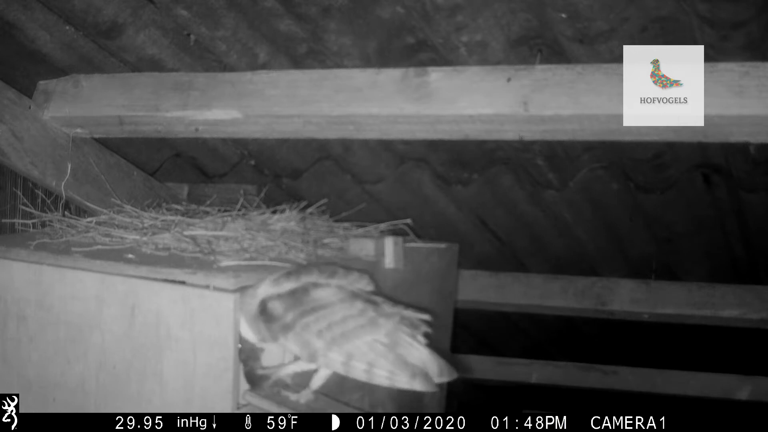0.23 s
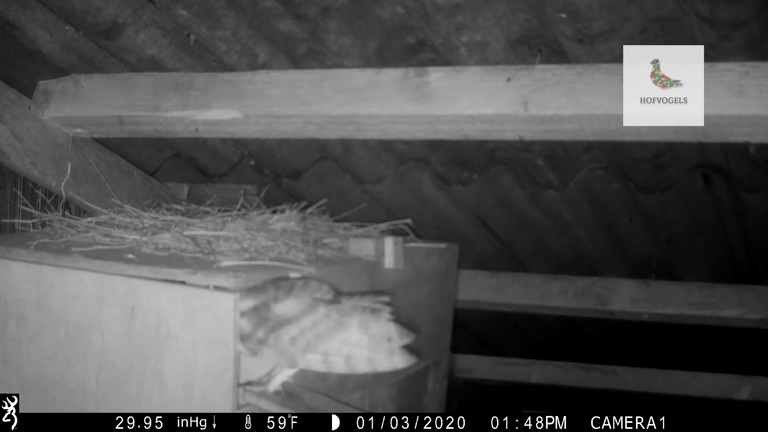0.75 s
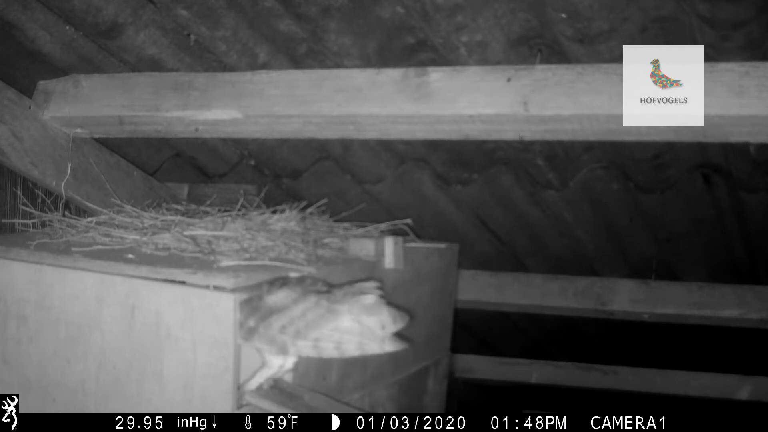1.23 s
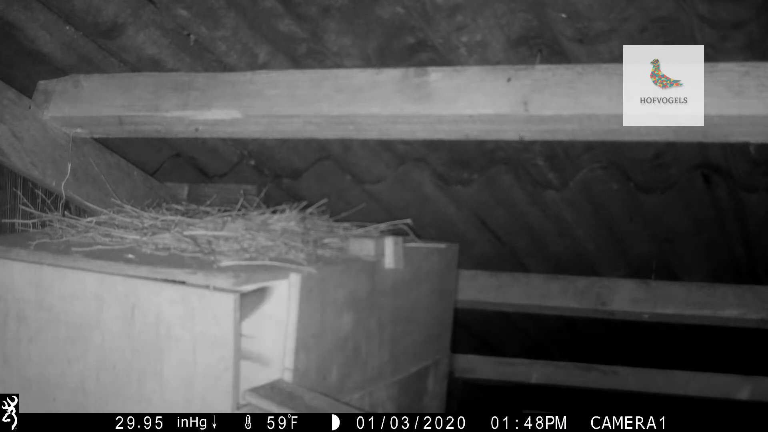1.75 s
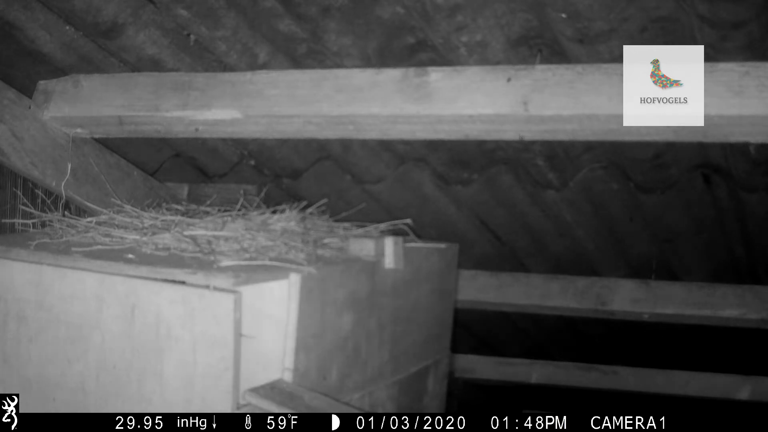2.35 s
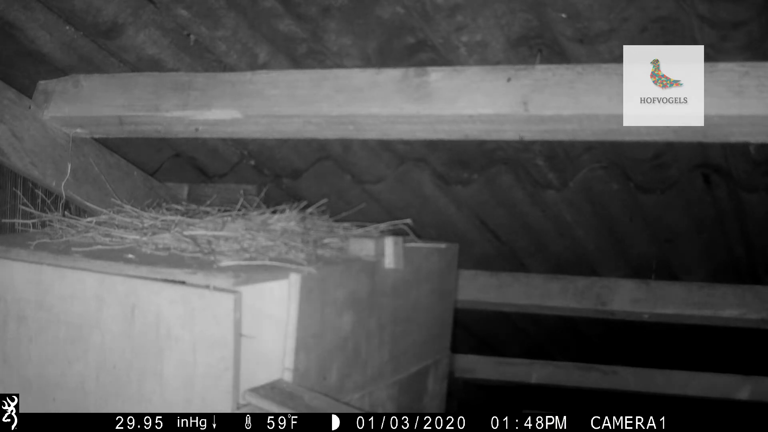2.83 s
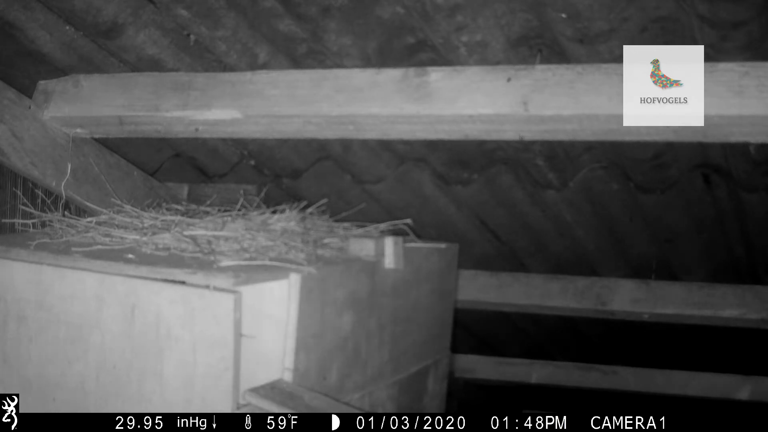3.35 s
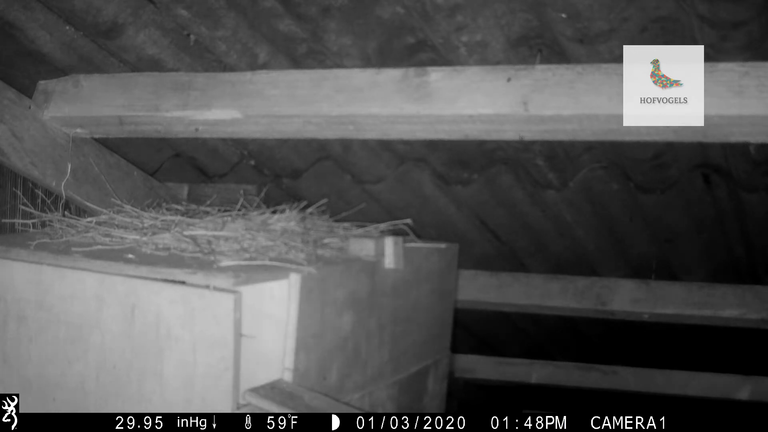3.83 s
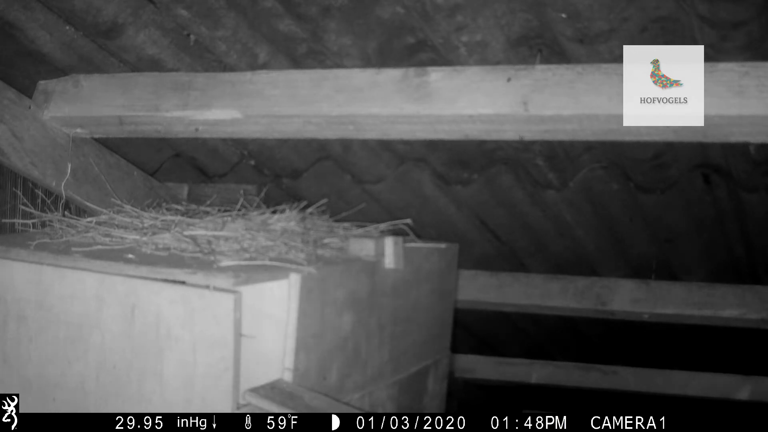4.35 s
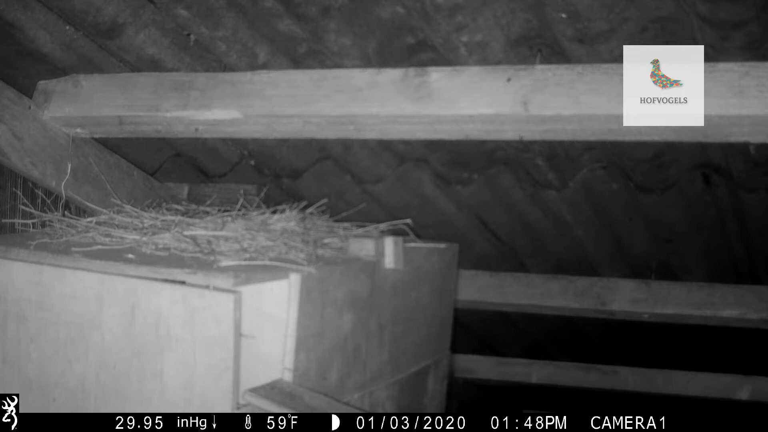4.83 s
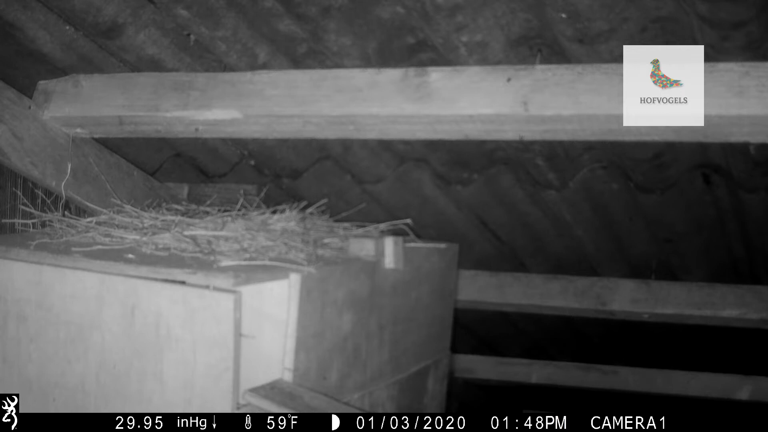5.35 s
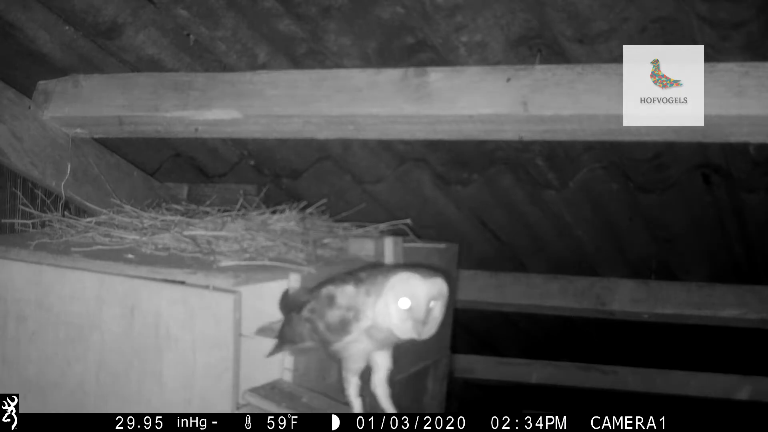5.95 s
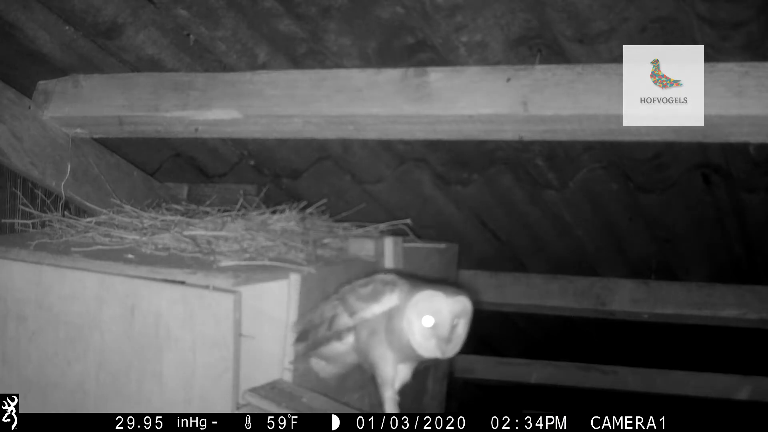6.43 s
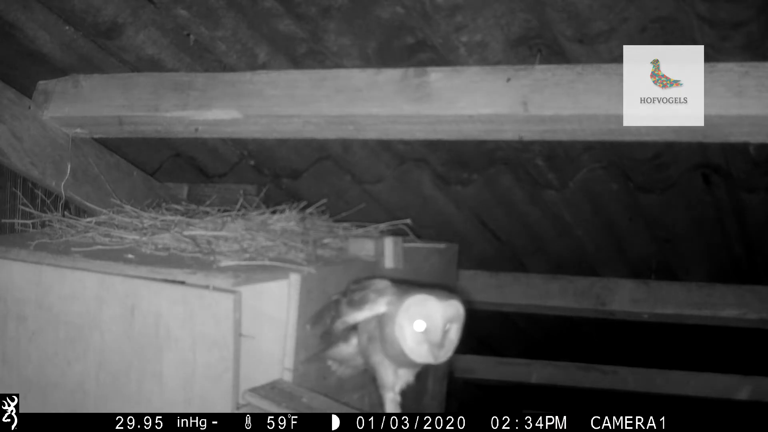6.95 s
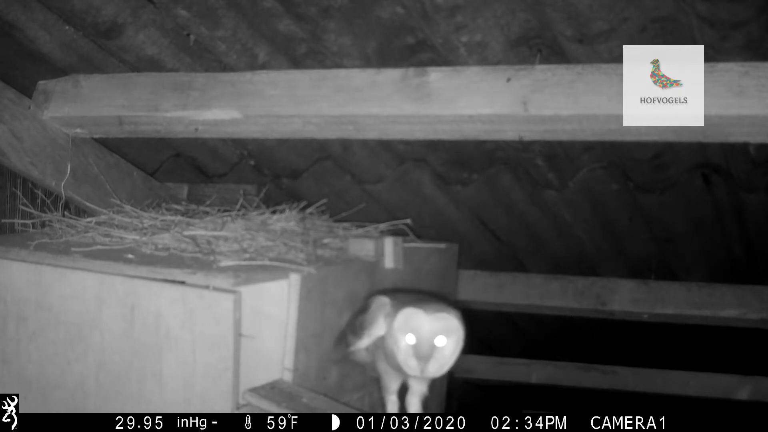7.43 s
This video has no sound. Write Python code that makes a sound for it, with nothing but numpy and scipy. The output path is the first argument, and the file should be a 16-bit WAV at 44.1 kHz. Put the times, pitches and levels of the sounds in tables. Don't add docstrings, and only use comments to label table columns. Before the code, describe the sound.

Harsh airy owl hisses swell and stop in a quiet loft, over steady rush and thin buzzing whine, with small wooden knocks and one snap.

```python
import sys
import numpy as np
from scipy import signal
from scipy.fft import rfft, irfft, next_fast_len
from scipy.io import wavfile
from scipy.ndimage import uniform_filter1d

SR = 44100
rng = np.random.default_rng(int(sys.argv[2]) if len(sys.argv) > 2 else 0)


def level_to_linear(level):
    exponent = np.asarray(level, float) / 20
    return 10 ** exponent


def unload_audio(sound):
    columns = np.transpose(np.atleast_2d(sound))
    steps = np.round(np.clip(columns, -1, 1) * 32767)
    wavfile.write(sys.argv[1], SR, steps.astype(np.int16))


N = 339129
SCENE_CHANGE_S = 5.4618


def evened(x):
    return x / np.sqrt(np.mean(x ** 2) + 1e-20)


def read(points, hz):
    f, value = np.transpose(points)
    return np.interp(np.log(hz + 1), np.log(f + 1), value)


def add(mix, start_s, sound):
    part = mix[round(start_s * SR):][:len(sound)]
    part += sound[:len(part)]


def ring(hz, db, t60, rise=0.00023):
    t = np.arange(4000) / SR
    return level_to_linear(db - 60 * t / t60) * (1 - np.exp(-t / rise)) * np.sin(2 * np.pi * hz * t)


def drift(size, smooth):
    width = max(int(smooth), 1)
    once = uniform_filter1d(rng.standard_normal(size), width)
    return evened(uniform_filter1d(once, width))


# (start [s], length [s], top effort [dB], share of length spent swelling [0-1], swell [dB])
HISSES = [
    (0.126, 0.673, -50.5, 0.86, 15),
    (1.071, 0.648, -41, 0.5, 16.5),
    (1.42, 0.55, -50.5, 0.85, 8),
    (2.545, .775, -40, 0.61, 17.5),
    (3.099, 0.45, -50.5, 0.86, 2),
    (3.765, .64, -47, 0.71, 17.5),
    (4.845, 0.79, -45.5, 0.58, 16),
    (5.4, 0.54, -44, 0.75, 10),
    (5.78, .8, -57, 1, 11),
    (6.945, .68, -49.5, 0.62, 9.5),
]
# (pitch [Hz], width [Hz], level [dB])
THROAT_1 = [(1540, 370, -11.5), (2280, 450, -11.5), (2455, 97, -1.5), (2830, 700, -5.5), (3260, 120, -10.5),
            (3440, 160, -5), (3590, 230, -4.5), (3730, 92, 4), (4180, 510, -2.5), (4580, 54, 0.5),
            (4820, 120, -11), (5080, 280, -21), (5390, 310, -16.5), (6040, 160, -24)]
THROAT_2 = [(2050, 710, -19.5), (2380, 470, -10), (2650, 140, -6.5), (2760, 120, -12.5), (3130, 170, -10),
            (3200, 160, -10), (3410, 150, -9), (3580, 180, -2.5), (3800, 160, 2), (4070, 180, -6),
            (4360, 99, -7.5), (4580, 130, -19), (4860, 420, -21.5), (5480, 160, -30)]
THROAT_3 = [(1430, 97, -2), (1640, 190, -14.5), (1990, 230, -5.5), (2336, 190, 0.5), (2580, 580, -6),
            (3030, 270, -5), (3330, 100, -8), (3620, 490, -8), (4000, 210, -7.5), (4144, 51, 2.5),
            (4350, 200, -14), (4620, 170, -10), (5000, 180, -19), (5430, 970, -27.5)]
THROAT_4 = [(1760, 430, -28), (2385, 390, -8), (2570, 120, -14), (2770, 120, -21), (3490, 200, -4),
            (3180, 210, -9), (3250, 80, -3.5), (3728, 250, 2.5), (4060, 660, -7.5), (4320, 210, -3.5),
            (4430, 77, -13), (4760, 240, -12), (5330, 390, -23.5), (5960, 360, -30.5)]
THROAT_5 = [(2070, 490, -11), (2355, 86, -3.5), (2580, 180, -13), (2880, 140, -12.5), (3180, 90, -10),
            (3240, 270, -14), (3545, 71, 2), (3694, 98, 0), (3900, 86, -2.5), (4100, 200, -7),
            (4370, 89, -4), (4780, 100, -18), (5130, 110, -24), (5600, 700, -31)]
THROAT_6 = [(1490, 110, -1), (1650, 62, -6.0), (2080, 640, -2), (2280, 92, -5), (2740, 120, -3),
            (2970, 260, -6), (3520, 380, -4), (3860, 91, -2), (4170, 430, -4.5), (4280, 190, -8.5),
            (4550, 120, -4.5), (4780, 120, -10), (5100, 840, -19.5), (5910, 130, -32)]
THROAT_7 = [(1447, 120, -13), (1700, 190, -21), (2050, 410, -19.5), (2355, 400, -5), (2640, 150, -14),
            (3080, 210, -10.5), (3410, 280, -15), (3800, 55, -1), (3840, 600, -4), (4130, 280, -8.5),
            (4560, 320, -10.5), (5050, 70, -20), (5200, 390, -21), (6300, 150, -35)]
THROAT_8 = [(1620, 120, -18), (1800, 160, -22), (2025, 160, -11.5), (2280, 104, -5.5), (2470, 58, -11),
            (2910, 610, -10.5), (3170, 150, -8), (3580, 130, -3), (3753, 66, 3), (4120, 380, -2),
            (4470, 61, -8), (4780, 160, -14.5), (5330, 170, -21.5), (5530, 120, -23)]
THROAT_9 = [(1310, 210, 0.5), (1740, 810, -9), (2320, 620, -13), (2404, 110, 5), (2640, 150, 1),
            (2810, 100, 0), (3190, 370, -9), (3500, 69, 2.5), (3790, 480, -2.5), (4130, 79, -7.0),
            (4160, 80, -4), (4360, 230, -7), (4790, 320, -13.5), (5300, 300, -23.0)]
THROAT_10 = [(1720, 510, -17), (2080, 130, -9), (2400, 220, -1.5), (2870, 290, -7.5), (3300, 260, -8),
             (3780, 120, 1.5), (3810, 510, 1.5), (4140, 70, -11), (4290, 250, 1), (4530, 130, 0.5),
             (4740, 140, -7), (5100, 220, -22), (5360, 380, -16), (6180, 280, -28)]
# (lower throat [dB], beak
# air [dB], share of missing effort the lower throat is spared [-1 to 1], attack [s])
HEADS = [(-5.5, -34, .2, 0.063), (-11.5, -37.5, 0.3, 0.041), (-0.5, -32, 0.34, .06), (-6, -35, 0.31, 0.054),
         (-4, -30, 0.4, .06), (-3.5, -33, 0.4, 0.051), (-4, -33.5, -.2, 0.075), (-7, -36, 0.34, .05),
         (-4, -35, 1, 0.054), (-4.5, -35, -.3, 0.12)]


def owls():
    out = np.zeros(N)
    throats = (THROAT_1, THROAT_2, THROAT_3, THROAT_4, THROAT_5,
               THROAT_6, THROAT_7, THROAT_8, THROAT_9, THROAT_10)
    for call, throat, head in zip(HISSES, throats, HEADS):
        add(out, call[0], hiss(call, throat, head))
    return out


# (pitch [Hz], level [dB per Hz])
BREATH = [(900, -63), (1300, -22), (1900, -33.5), (2400, -22), (2900, -24), (3700, -15), (4500, -23),
          (5100, -38), (5900, -42.5), (7000, -51.5), (8300, -38.5), (9900, -39.5), (11000, -53.5),
          (13800, -65)]


def hiss(call, throat, head):
    start, length, top_db, swelling, swell_db = call
    low_db, beak_db, low_spared, attack_s = head
    t = np.arange(0, length + 0.16, 1 / SR)
    size = 45000
    hz = np.fft.rfftfreq(size, 1 / SR)
    flutter_db = 0.15 * drift(size, 150) + 0.31 * drift(size, 900)
    air = rng.standard_normal(size) * level_to_linear(flutter_db)

    power = level_to_linear(2 * read(BREATH, hz))
    for f, width, db in throat:
        power = power + level_to_linear(2 * db) / (1 + (2 * (hz - f) / width) ** 2) ** 2

    turn = np.pi / 2 * np.minimum(np.arange(size) / len(t), 1)
    combed = 0
    for fade in (np.cos(turn) ** 2, np.sin(turn) ** 2):
        comb_db = 3.0 * drift(len(hz), 14 * size / SR)
        combed = combed + rfft(air * fade) * level_to_linear(comb_db)
    coloured = combed * np.sqrt(power)

    low = 1 / (1 + (hz / 2950) ** 30)
    high = 1 / (1 + (6800 / (hz + 1)) ** 20)
    middle = 1 - low - high
    skirt = middle / (1 + (4250 / (hz + 1)) ** 20)
    beak = high * level_to_linear(1.5 * drift(len(hz), 120))

    def sound_of(share, level_share, lo, hi):
        inside = (hz > lo) & (hz < hi)
        scale = size / np.sqrt(2 * np.sum(abs(coloured * level_share)[inside] ** 2))
        return scale * irfft(coloured * share, size)[:len(t)]

    missing_db, release_db = effort(t, length, swelling, swell_db)
    low_gain = level_to_linear(low_db + low_spared * missing_db + 0.22 * release_db)
    beak_gain = level_to_linear(beak_db + 0.35 * missing_db)
    out = sound_of(low, low, 1300, 2950) * low_gain
    out = out + sound_of(beak, beak, 8500, 11000) * beak_gain
    out = out + sound_of(middle, middle, 2950, 5600)
    out = out + sound_of(skirt, middle, 2950, 5600) * (level_to_linear(0.16 * missing_db) - 1)

    same_take = (start + t < SCENE_CHANGE_S) == (start + length / 2 < SCENE_CHANGE_S)
    attack = np.minimum(t / attack_s, 1) ** 2
    return out * level_to_linear(top_db - missing_db - release_db) * attack * same_take


def effort(t, length, swelling, swell_db):
    u, top = t / length, np.clip(swelling, 0.1, 0.95)
    swell = swell_db * np.maximum(1 - u / top, 0) ** 1.54
    sag = 3 * np.clip((u - top) / (1 - top), 0, 1) ** 2
    late = np.maximum(t - length, 0)
    release = 270 * late ** 2 / (late + 0.005)
    return swell + sag, release


# (pitch [Hz], level [dB], t60 [s])
SNAP = [(1770, -34, .03), (2130, -23, .014), (2600, -25, .011), (3480, -13, .008), (3800, -21, .011),
        (4150, -14, .007), (4450, -24, .007), (5100, -30, .006)]
# (delay [s], level [dB])
SNAP_ECHOES = [
    (0, -1),
    (.0021, -13),
    (.0043, -22),
    (.0062, -18),
    (.0085, -22),
    (.0113, -21),
    (.0168, -25),
]


def beak_snap():
    out = np.zeros(N)
    snap = sum((-1) ** k * ring(*mode, rise=0.0006) for k, mode in enumerate(SNAP))
    band = signal.butter(4, [1550, 5100], "bandpass", fs=SR, output="sos")
    snap = signal.sosfilt(band, snap)
    for delay, db in SNAP_ECHOES:
        add(out, 5.5138 + delay, level_to_linear(db) * snap)
    return out


# (time [s], peak level [dB], pitch [Hz], t60 [s])
CLAWS = [
    (1.59, -54, 1490, .04),
    (1.603, -52, 1950, 0.043),
    (1.63, -55, 1485, 0.04),
    (1.652, -51.5, 2050, 0.046),
    (4.836, -67, 3800, 0.028),
    (6.449, -54.5, 2000, 0.036),
    (6.449, -55, 3300, 0.027),
    (6.561, -55.5, 1800, 0.028),
]


def claws():
    return knocks(CLAWS, 1.25)


# (time [s], peak level [dB], pitch [Hz], t60 [s])
THUDS = [
    (1.859, -51, 640, 0.023),
    (1.862, -54, 330, 0.055),
    (1.862, -57, 150, 0.097),
    (1.881, -53, 170, 0.073),
    (1.889, -51, 450, 0.025),
    (1.925, -62, 170, 0.081),
    (2.391, -69, 250, .04),
]


def thuds():
    return knocks(THUDS, 1.55)


def knocks(hits, span):
    out = np.zeros(N)
    chances = rng.uniform(-1.2, 1, (len(hits), 14))
    for (s, db, hz, t60), chance in zip(hits, chances):
        places = np.linspace(-1, 1, len(chance)) + chance / len(chance)
        for place, sign in zip(places, np.sign(chance)):
            add(out, s, sign * ring(hz * span ** place, db, t60, rise=2 / hz))
    return out


def camera():
    whine_hz, lines_a_field = 7796.23, 131
    t = np.arange(N) / SR
    clock = t - np.where(t < SCENE_CHANGE_S, 0.01659, 0.011483)
    odd = np.floor(clock * whine_hz / lines_a_field) % 2
    turn = 2 * np.pi * whine_hz * clock
    whine = level_to_linear(-73) * np.where(odd, 0.6 * np.cos(turn + 2.82), np.cos(turn))
    octave = level_to_linear(-95) * np.cos(2 * turn)

    u = np.maximum(np.arange(60) - 1.5, 0) / 19
    kick = np.sin(2 * np.pi * u) * np.exp(-u ** 2) * (1 - np.exp(-u / 0.05))
    changes = -np.diff(odd, prepend=odd[0])
    ticks = signal.oaconvolve(changes, level_to_linear(-51.5) * kick / kick.max())[:N]

    bump = np.exp(-((t - SCENE_CHANGE_S) / 0.00029) ** 2)
    click = 0.11 * (np.arange(N) == round(SCENE_CHANGE_S * SR))
    return whine + octave + ticks + level_to_linear(-39) * (bump + click)


# (pitch [Hz], level [dB per Hz])
FLOOR = [(25, -18.5), (62, -12.5), (120, -7), (250, -3.5), (630, 0), (1000, 0), (2000, -6), (3200, -14.5),
         (4000, -19), (5000, -29), (6300, -37.5), (10000, -43), (12500, -39), (15500, -37)]


def floor():
    size = next_fast_len(N)
    hz = np.fft.rfftfreq(size, 1 / SR)
    noise = irfft(rfft(rng.standard_normal(size)) * level_to_linear(read(FLOOR, hz)), size)
    return level_to_linear(-58.5) * evened(noise[:N])


def scene():
    return (owls() + beak_snap() + claws() + thuds() + camera() + floor())[None]


def band_limit(x):
    return signal.sosfilt(signal.butter(12, 15720, fs=SR, output="sos"), x)


def record(dry):
    hz, spectrum = np.fft.rfftfreq(N, 1 / SR), rfft(dry)
    hole = np.where((hz > 12760) & (hz < 14950), 0.25, 1)
    patch = irfft(spectrum * ((hz > 13300) & (hz < 14400)), N)
    loud = uniform_filter1d(dry ** 2, size=2000) > level_to_linear(2 * -43.6)
    is_open = loud & (np.arange(N) < SCENE_CHANGE_S * SR)
    opening = uniform_filter1d(1. * is_open, size=400)
    mix = irfft(spectrum * hole, N) + 1.9 * patch * opening
    return band_limit(mix)


dry = scene()
out = record(dry)
unload_audio(out)
```